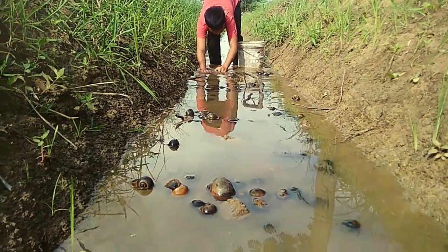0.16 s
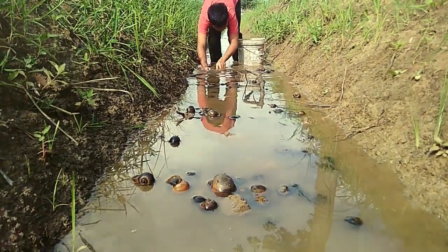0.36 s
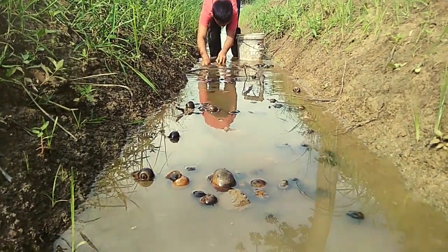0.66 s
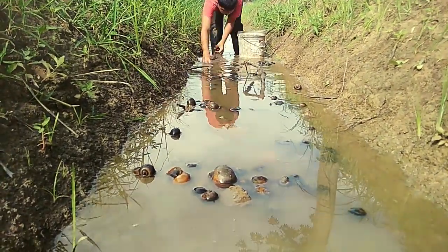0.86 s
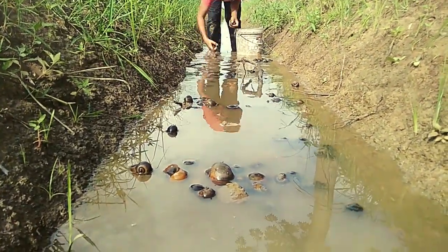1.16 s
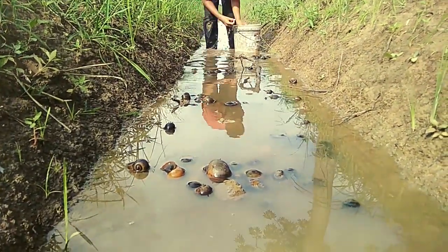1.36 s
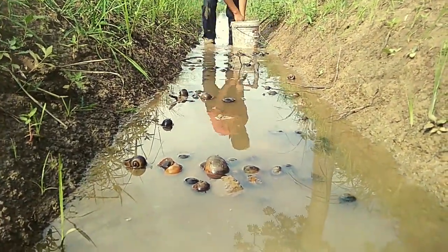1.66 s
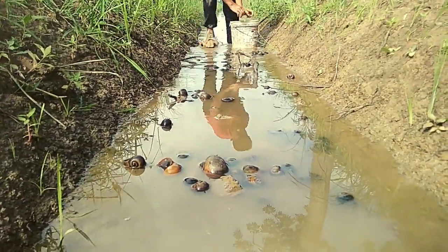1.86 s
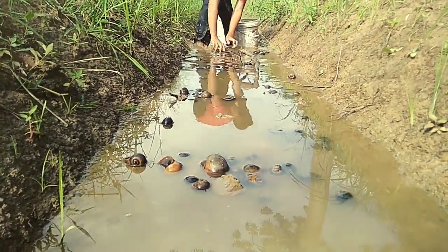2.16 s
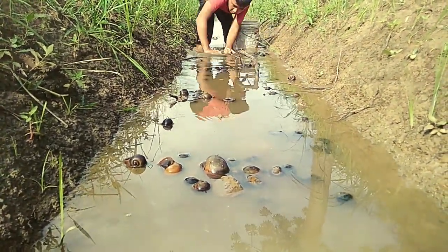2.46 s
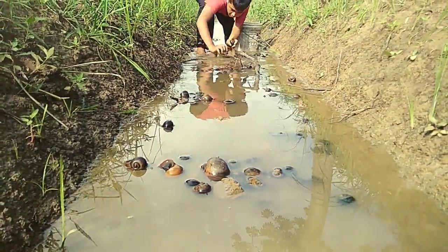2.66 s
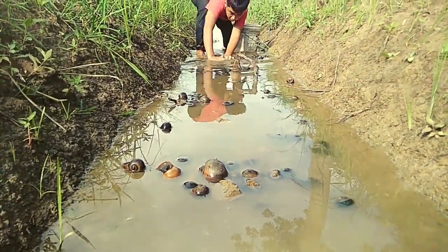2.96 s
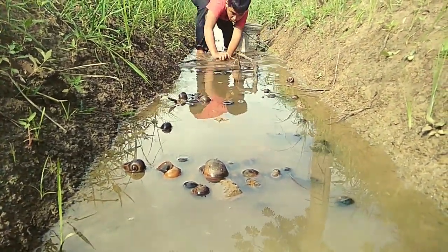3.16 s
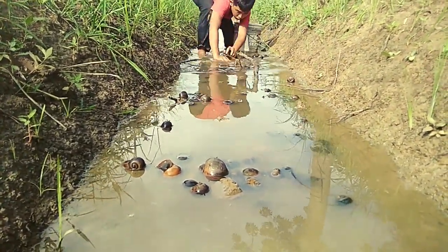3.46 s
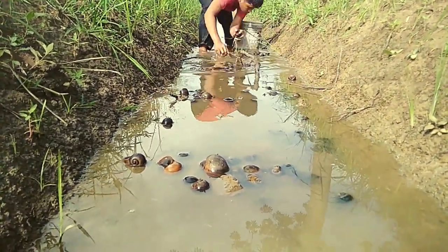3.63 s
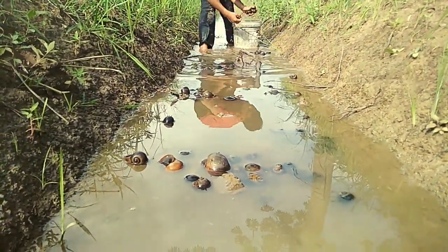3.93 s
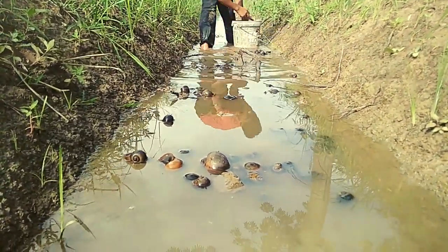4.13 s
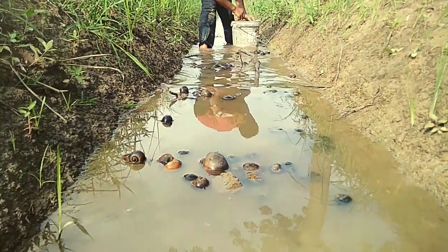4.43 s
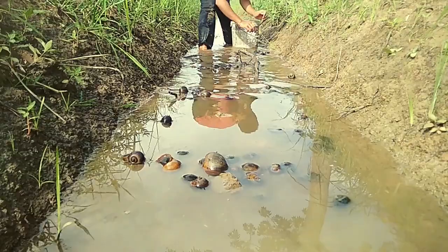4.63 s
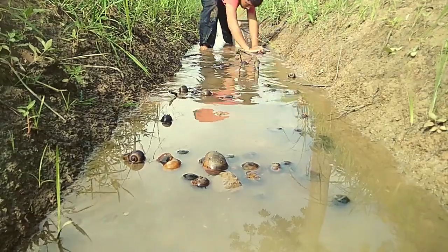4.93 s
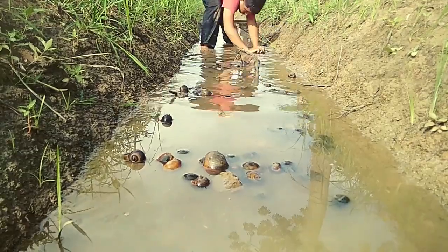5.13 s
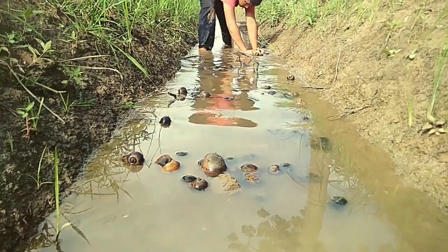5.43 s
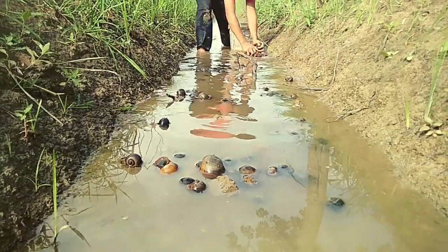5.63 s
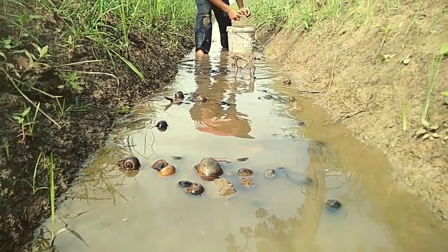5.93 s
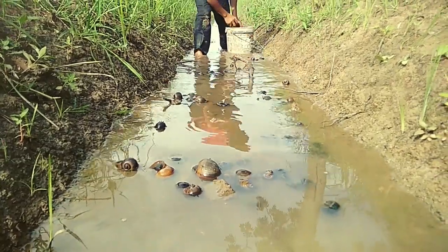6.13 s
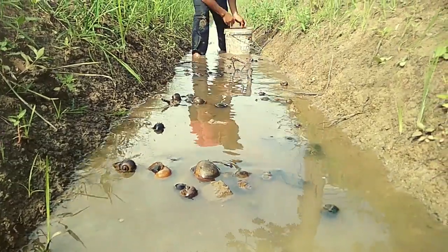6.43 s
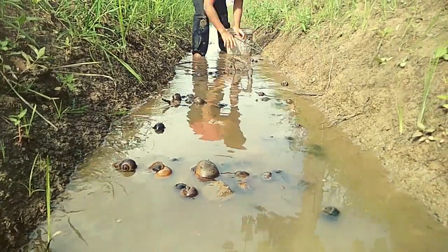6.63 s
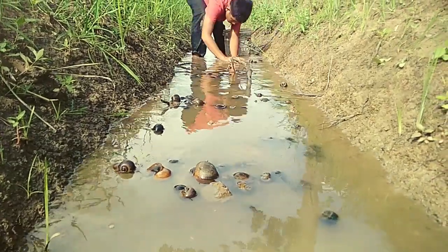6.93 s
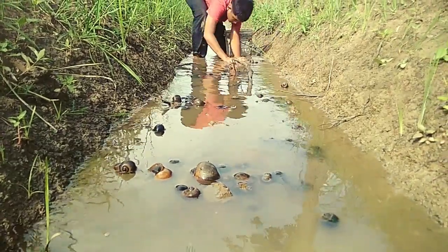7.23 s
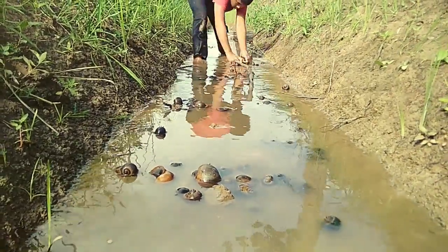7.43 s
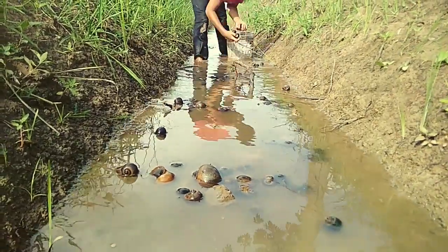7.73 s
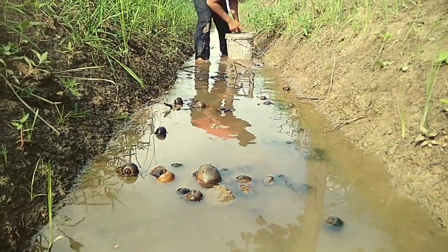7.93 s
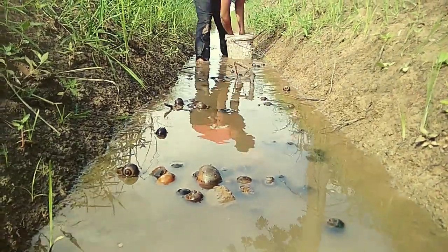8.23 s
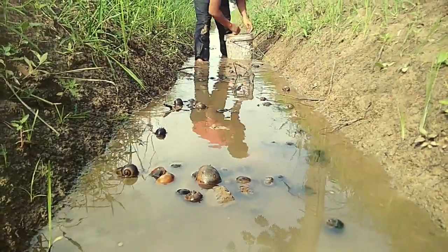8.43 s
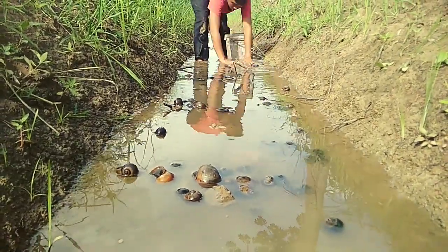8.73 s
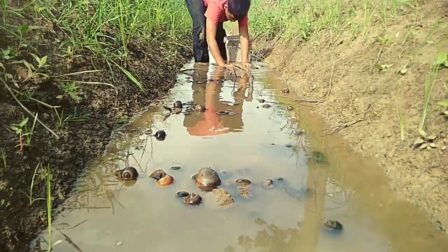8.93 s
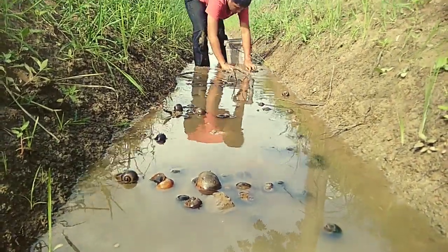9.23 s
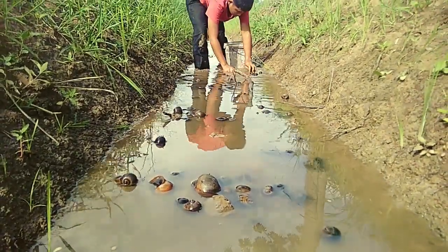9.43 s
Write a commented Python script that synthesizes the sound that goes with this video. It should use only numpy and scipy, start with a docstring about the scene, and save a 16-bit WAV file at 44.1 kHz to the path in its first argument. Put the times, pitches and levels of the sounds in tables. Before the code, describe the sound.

Hands stir shallow muddy ditch water with plops and drips, while snail shells click and tumble in clattering handfuls into a plastic bucket outdoors.

```python
"""Gathering snails in a muddy ditch

Hands stir shallow water: noise and crowds of ringing bubbles make splashes, gurgles, plops and drips.
Shells click together as filtered noise bursts, and handfuls tumble into a plastic bucket of damped modes.
Far away a one-cylinder engine chugs as a filtered pulse train, and a small bird whistles in gliding sines.
Shaped noise makes a steady hiss, almost all on the left, and a broad background that falls and rises;
moving air rumbles and bumps at the microphone.
"""
import sys
import numpy as np
from scipy import signal
from scipy.fft import rfft, irfft, next_fast_len
from scipy.io import wavfile
from scipy.ndimage import map_coordinates

SR = 44100
rng = np.random.default_rng(int(sys.argv[2]) if len(sys.argv) > 2 else 0)


def store_pcm(level_fs):
    """Save levels as 16-bit WAV."""
    pcm = np.round(np.clip(level_fs, -1, 1) * 32767).astype(np.int16)
    wavfile.write(sys.argv[1], SR, np.atleast_2d(pcm).T)


N = 422473

# spectrum of stirred water, also of the wet scrape on the bucket: (frequency [Hz], level [dB])
SLOSH_SPECTRUM = [(150, 0), (350, 4), (550, 1.5), (900, 4), (1500, -2.5), (3000, -1.5), (6000, -29.5)]
FADE_IN_S = .006  # a short noise fade-in before each click
TOP_HZ = 15950  # upper limit of the band


def amp(db):
    """Decibels are a logarithmic measure: 20 dB is a factor of ten in amplitude."""
    return 10 ** (np.asarray(db) / 20)


def unit(x):
    """Root-mean-square normalisation: equal mean power for every signal."""
    return x / np.sqrt(np.mean(x ** 2) + 1e-20)


def seconds(length):
    """Uniform sampling: the times [s] of the samples in a sound."""
    return np.arange(int(length * SR)) / SR


def along(points, hz):
    """Logarithmic frequency scale: (frequency [Hz], value) points are joined along it."""
    f, v = np.transpose(points)
    return np.interp(np.log(hz + 1), np.log(f + 1), v)


def curves(rows):
    """Linear interpolation in time: one value per sample for each column after the time."""
    s, *cols = np.transpose(rows)
    return [np.interp(np.arange(N) / SR, s, c) for c in cols]


def wobble(rate):
    """Slow random modulation: a smooth curve through normal random knots, rate of them a second."""
    knots = rng.standard_normal(int(N * rate / SR) + 4)
    return map_coordinates(knots, [np.arange(N) * rate / SR])


def add(track, s, sound):
    """Superposition: a sound is summed into the track from second s."""
    start = max(round(s * SR), 0)
    part = track[start:start + len(sound)]
    part += sound[:len(part)]


def filtered(x, response):
    """Linear filtering: the spectrum of x times a complex response of frequency."""
    m = next_fast_len(N + SR // 2)
    return irfft(rfft(x, m) * response(np.fft.rfftfreq(m, 1 / SR)), m)[..., :N]


def coloured(x, spectrum, size=4096):
    """Minimum-phase filtering: a causal kernel of energy 1 with the given (Hz, dB) shape."""
    cepstrum = irfft(np.log(amp(along(spectrum, np.fft.rfftfreq(size, 1 / SR)))))
    # folding the cepstrum onto positive times makes the kernel causal
    cepstrum[1:size // 2] *= 2
    cepstrum[size // 2 + 1:] = 0
    kernel = irfft(np.exp(rfft(cepstrum)))
    return signal.fftconvolve(x, kernel / np.linalg.norm(kernel))[:len(x)]


def noise(spectrum):
    """Spectral shaping: white noise takes the given colour, at rms 1."""
    return unit(coloured(rng.standard_normal(N), spectrum))


def panned(x, left_db):
    """Level difference between ears: left is louder by left_db, and the mean of both stays x."""
    ratio = amp(left_db)
    return np.array([x * ratio, x]) * 2 / (1 + ratio)


def ring(modes, t, scatter_db):
    """Modal vibration: damped sines whose strengths vary with the spot that is struck; peak 1."""
    hz, db, t60 = np.transpose(modes)[:, :, None]
    strength, detune = rng.standard_normal((2, len(modes), 1))
    decay = amp(db + scatter_db * strength - 60 * t / t60)
    x = np.sum(decay * np.sin(2 * np.pi * hz * (1 + 0.0095 * detune) * t), axis=0)
    return x / np.abs(x).max()


def burst(spectrum, t, t60):
    """Exponential decay: coloured noise dies by 60 dB in t60 seconds; peak 1."""
    x = coloured(amp(-60 * t / t60) * rng.standard_normal(len(t)), spectrum)
    return x / np.abs(x).max()


def droplets(rate, centre_hz, spread, cycles, size_db, size=600):
    """Bubble resonance in a crowd: tiny drops and bubbles ring and rise in pitch as they die; rms 1."""
    count = int(rate * N / SR)
    start = rng.integers(0, N, (count, 1))
    hz = centre_hz * np.exp(spread * rng.standard_normal((count, 1)))
    hz = np.clip(hz, 200, SR / 3)
    turns = hz * np.arange(size) / SR
    age = turns / cycles
    strength = amp(size_db * np.minimum(rng.exponential(size=(count, 1)), 3))
    drops = strength * np.exp(-age) * np.sin(2 * np.pi * turns * (1 + age / 20))
    return unit(np.bincount((start + np.arange(size)).ravel(), drops.ravel(), N)[:N])


def plop(t, hz, glide, length):
    """Air-pocket resonance: pitch glides as the pocket changes size; churned water makes it ragged."""
    u = t / length
    phase = 2 * np.pi * np.cumsum(hz * 2 ** (glide * np.minimum(u, 1.5))) / SR
    churn = coloured(rng.standard_normal(len(t)), [(hz / 12, 0), (hz / 2, -15), (hz * 10, -60)])
    swell = 4.5 * u
    return swell * np.exp(1 - swell) * (.85 * np.sin(phase) + .5 * churn * np.cos(phase))


def clack(spectrum, crack_s, rattle_s, hold_s=0):
    """Impact of hard wet shells: fade-in, crack that may hold, and rattle, through their resonances."""
    scatter_db = 2.5  # every shell has resonances of its own
    t = seconds(.09) - FADE_IN_S
    late = np.maximum(t - hold_s, 0)
    dying = amp(-60 * late / crack_s) + amp(-5) * amp(-60 * late / rattle_s)  # both times are t60
    fade_in = amp(-8 - 60 * abs(t) / .015)
    shape = np.where(t < 0, fade_in, dying)
    hz = np.geomspace(spectrum[0][0], TOP_HZ, 48)
    own = np.column_stack([hz, along(spectrum, hz) + scatter_db * rng.standard_normal(len(hz))])
    click = coloured(shape * rng.standard_normal(len(t)), own)
    return amp(9.5) * click / np.linalg.norm(click)


def splashes():
    """Entrained air: each stroke sloshes around the pitch of its hollow, sprays drops, then gurgles."""
    # strokes that stir, lift or spill water: (time [s], length [s], slosh level before its swell [dB],
    # spray level before its swell [dB], pitch of the hollow [Hz])
    strokes = [(1.176, 0.19, -61, -57.5, 1500), (1.812, 0.12, -45.5, -58, 790),
               (1.98, 0.074, -70, -44, 2500), (2.036, 0.042, -48, -48.5, 2000),
               (2.077, 0.18, -50, -52, 576), (2.19, 0.26, -57, -59, 980), (2.433, 0.05, -64, -60.5, 2000),
               (2.852, 0.041, -44.5, -45, 2730), (2.909, 0.057, -64, -48.5, 2960),
               (3.4, 0.03, -62, -53.5, 3320), (4.42, 0.11, -48, -58, 1060), (6.577, 0.052, -57, -50, 2300),
               (6.916, 0.0074, -39, -37.5, 1370), (7.478, 0.024, -49, -60, 980),
               (8.225, 0.031, -43, -66, 705), (8.27, 0.071, -51.5, -57, 2500)]
    # spectrum of the fine spray: (frequency [Hz], level [dB])
    spray_spectrum = [(900, -10.5), (2300, 6), (3200, 5.5), (4500, 3), (7000, 9), (10000, 10.5),
                      (15000, 4.5)]
    pocket_q, pocket_db = 2.8, 5  # ringing hollow: sharpness, level over the plain slosh
    gurgle_db, gurgle_lasts = -13.5, 3.15  # level relative to the slosh, decay time in stroke lengths
    coarse = droplets(1300, centre_hz=1089, spread=0.715, cycles=10, size_db=3.5)
    fine = droplets(3500, centre_hz=5085, spread=0.63, cycles=5, size_db=4)
    fine = fine + 0.72 * rng.standard_normal(N)
    gurgles = droplets(180, centre_hz=850, spread=.6, cycles=9, size_db=4.5, size=2400)
    wash = unit(coloured(coarse, SLOSH_SPECTRUM))
    mist = unit(coloured(fine, spray_spectrum))
    clumps = unit(amp(3.1 * wobble(95)))  # water breaks up in uneven gulps
    track = np.zeros(N)
    for s, length, slosh_db, spray_db, hz in strokes:
        span = slice(max(round(s * SR), 0), min(round(s * SR) + SR, N))
        t = np.arange(span.stop - span.start) / SR
        u = t / (0.33 * length)
        settling = amp(-19) * (1 - np.exp(-u)) * np.exp(-t / 0.07)  # the water settles after the stroke
        swell = u * np.exp(1 - u) + settling
        pocket = unit(signal.lfilter(*signal.iirpeak(hz, pocket_q, fs=SR), wash[span]))
        slosh = amp(slosh_db) * unit(wash[span] + amp(pocket_db) * pocket)
        spray = amp(spray_db) * mist[span]
        churned = amp(slosh_db + gurgle_db) * (1 - np.exp(-u)) * np.exp(-t / (gurgle_lasts * length))
        add(track, s, clumps[span] * swell * (slosh + spray) + churned * gurgles[span])
    return track


def bubbles():
    """Volume resonance of trapped air: the hands close air pockets under the water, and they plop."""
    # pockets: (time [s], level [dB], starting pitch [Hz], glide [octaves per length], length [s])
    pockets = [(1.14, -42.5, 294, -0.86, 0.055), (1.283, -44.5, 659, 0.99, 0.041),
               (1.915, -36, 640, -0.38, 0.019), (2.024, -46, 1076, 0.25, 0.04),
               (2.089, -46, 605, 0.27, .03), (2.223, -32.5, 295, 1, 0.038), (2.277, -42, 440, 0.32, 0.04),
               (2.868, -33, 487, 0.31, 0.015), (5.492, -45.5, 2365, -0.6, 0.02),
               (6.907, -28.5, 723, 0.14, 0.014), (6.93, -38, 463, 0.013, 0.013),
               (7.495, -34, 1246, 0.14, 0.015), (8.224, -34.5, 480, -0.12, 0.0085),
               (8.592, -34.5, 1095, 0.084, 0.022)]
    track, t = np.zeros(N), seconds(.15)
    for s, db, hz, glide, length in pockets:
        add(track, s, amp(db) * plop(t, hz, glide, length))
    return track


def drips():
    """Drop impact: a tick on the surface around the pitch of the one small bubble that it leaves."""
    # drops falling from the hands: (time [s], level [dB], bubble pitch [Hz])
    drops = [(.179, -47.5, 2410), (.233, -50, 1500), (1.153, -54, 1380), (1.225, -44, 1570),
             (1.333, -47, 1990), (1.429, -50, 1820), (2.08, -38, 1390), (2.287, -43, 1057),
             (2.441, -46, 2750), (2.58, -47, 2220), (2.753, -42.5, 2800), (3.4, -43, 1770),
             (4.113, -47.5, 1470), (5.0, -40, 1410), (9.337, -47, 2700)]
    length, glide, tick_db = 0.013, 0.12, 4  # bubble length [s], rise [octaves per length]; tick [dB]
    track, t = np.zeros(N), seconds(2 * length)
    for s, db, hz in drops:
        tick = burst([(hz / 2, -10), (hz, 0), (hz * 10, -20)], t, t60=2 * length)
        add(track, s, amp(db) * (plop(t, hz, glide, length) / 2 + amp(tick_db) * tick))
    return track


def shells():
    """Brief contact: shells click together in the hands, and a spectral tilt sets how bright each is."""
    # clicks: (time of the crack [s], level [dB], tilt about 4 kHz [dB per octave])
    clicks = [(.659, -39.5, 1), (0.69, -26.5, 8.5), (1.226, -31, -5.5), (2.376, -15, -.5),
              (2.3939, -9.5, -1.5), (2.533, -36.5, -7), (2.873, -25, -2), (2.924, -22.5, 0),
              (4.981, -36, -2), (6.909, -22, 5), (8.861, -23, -3.5), (8.874, -26, 6)]
    # spectrum of shell on shell: (frequency [Hz], level [dB])
    shell_spectrum = [(600, -8.5), (2000, -7.5), (3100, 7.5), (4000, -8.5), (5100, 3.5), (6500, 7.5),
                      (9000, 5), (15000, -2)]
    track = np.zeros(N)
    for s, db, tilt_db in clicks:
        spectrum = [(hz, level + tilt_db * np.log2(hz / 4000)) for hz, level in shell_spectrum]
        add(track, s - FADE_IN_S, amp(db) * clack(spectrum, crack_s=.0035, rattle_s=.012))
    return track


def bucket():
    """Modal impact: a shell thuds on the plastic bottom, tips on its neighbours and scrapes the wall."""
    # shells that land and bounce: (time [s], thud level [dB], clack level [dB])
    landings = [(1.549, -35, -57), (1.767, -30.5, -42), (1.777, -37, -28), (1.814, -31.5, -34),
                (1.842, -42, -33), (1.861, -40, -32), (1.889, -33, -22), (1.919, -32.5, -30),
                (1.945, -36, -24), (1.981, -33, -30), (2.006, -37.5, -50), (4.412, -25.5, -17),
                (4.441, -24, -27.5), (4.461, -20.5, -25.5), (4.475, -42, -28), (4.505, -27.5, -25),
                (4.526, -50, -28), (4.547, -34, -36), (4.585, -40, -47), (4.69, -48, -45),
                (4.843, -43.5, -35.5), (6.422, -29, -24), (6.447, -37, -26.5), (6.464, -32.5, -36),
                (6.482, -31, -35.5), (6.535, -31, -13), (6.556, -29, -47), (6.632, -35.5, -40.5),
                (8.223, -33, -42), (8.366, -38.5, -34), (8.405, -33.5, -33), (8.467, -32.5, -29),
                (8.502, -28.5, -31.5), (8.522, -42, -25), (8.555, -34.5, -36), (8.589, -25.5, -28.5),
                (8.616, -47, -28), (8.634, -31.5, -36), (8.703, -37.5, -54), (8.881, -36.5, -40),
                (9.03, -42, -45)]
    # modes of the bucket's bottom: (frequency [Hz], level [dB], t60 [s])
    bottom = [(156, -1.5, 0.078), (293, -25, 0.15), (309.7, 13.5, 0.12), (349, 0.5, 0.22),
              (602, -6.5, 0.13)]
    # modes of the bucket's wall: (frequency [Hz], level [dB], t60 [s])
    wall_modes = [(756, -6, 0.082), (866, 3.5, 0.12), (1147, -3.5, 0.092), (1400, -3, 0.052),
                  (2220, -11, 0.029), (2767, -9.5, 0.035), (3530, -4, 0.038), (4370, -3, .04),
                  (4980, -17, .04)]
    # spectrum of the jolted heap: (frequency [Hz], level [dB])
    heap_spectrum = [(60, -33), (160, 8), (260, 9), (520, 5), (750, -26.5), (6000, -60)]
    # spectrum of shells clacking in the heap: (frequency [Hz], level [dB])
    clack_spectrum = [(500, 6.5), (900, 4.5), (1700, 1), (2700, 5.5), (4500, -3.5), (5500, -1), (7000, 2.5),
                      (15000, -9.5)]
    tip_s = .009  # a landed shell tips against its neighbours this much later
    wall_db, scrape_db = -4, -8.5  # wall ring and wet scrape, relative to the mean of thud and clack
    track, t = np.zeros(N), seconds(.25)
    for s, thud_db, clack_db in landings:
        thud = ring(bottom, t, scatter_db=1.5) + amp(-8) * burst(heap_spectrum, t, t60=.06)
        wall = amp(wall_db) * ring(wall_modes, t, scatter_db=4)
        scrape = amp(scrape_db) * burst(SLOSH_SPECTRUM, t, t60=.12)
        # many shells move at once in the heap, so its clack holds, then dies
        heap_clack = clack(clack_spectrum, crack_s=.011, rattle_s=.05, hold_s=.004)
        add(track, s, amp(thud_db) * thud)
        add(track, s + tip_s, amp((thud_db + clack_db) / 2) * (wall + scrape))
        add(track, s + tip_s - FADE_IN_S, amp(clack_db) * heap_clack)
    return track


def bird():
    """Frequency and amplitude modulation: thin distant whistles arch, sag and rasp."""
    # whistles: (time [s], length [s], level before the flutter [dB], pitch at the top of the arch [Hz])
    whistles = [(5.293, 0.054, -63, 3500), (7.497, 0.088, -62, 3420), (9.412, 0.1, -53, 3600)]
    track = np.zeros(N)
    for s, length, db, hz in whistles:
        u = seconds(length) / length
        pitch = hz * (1 - 0.147 * (u - .3) ** 2) + 30 * wobble(134)[:len(u)]
        envelope = np.abs(np.sin(np.pi * u)) ** 0.14
        add(track, s, amp(db) * envelope * np.sin(2 * np.pi * np.cumsum(pitch) / SR))
    flutter = amp(2 * wobble(60) + 3 * wobble(500))
    return track * flutter


def engine():
    """Pulse train: one dull exhaust puff per firing, blurred by distance, with a haze of clatter."""
    # course of the engine: (time [s], level before the offsets of puffs and clatter [dB])
    course = [(0, -65.5), (2, -57), (4.3, -58.5), (6.3, -51), (9.58, -49.5)]
    # spectrum of the exhaust: (frequency [Hz], level [dB])
    exhaust = [(30, -34), (60, -14.5), (85, 1), (108, 1), (130, -2.5), (170, -8), (260, -28.5), (3000, -96)]
    # spectrum of the mechanical clatter: (frequency [Hz], level [dB])
    clatter_spectrum = [(420, -4.5), (500, 4.5), (620, -1), (760, -0.5), (900, -37.5)]
    db, = curves(course)
    turns = np.cumsum(21 + 0.2007 * wobble(1.8)) / SR + 0.3043  # about 21 firings a second
    firings = np.diff(np.floor(turns), prepend=0) * amp(2.3 * wobble(29))
    puffs = unit(coloured(firings, exhaust)) + 0.65 * noise(exhaust)
    clatter = noise(clatter_spectrum)
    return panned(amp(db - 1.5) * puffs, left_db=6.0) + panned(amp(db - 11.0) * clatter, left_db=3)


def background():
    """Shaped noise: a steady hiss, a broad noise that falls and rises, and air rumbling and bumping."""
    # course of the broad noise: (time [s], left level before its random sway [dB])
    course = [(0, -52.5), (.45, -75.5), (2.6, -55), (4, -69), (5.3, -58), (7.1, -50.5), (9.58, -52)]
    # spectrum of the steady hiss: (frequency [Hz], level [dB])
    hiss_spectrum = [(300, 10), (900, 3.5), (2200, -2), (3400, 4), (5000, -1), (6800, 5), (7600, 9),
                     (8400, -1), (10000, 0.5), (14000, -24.5)]
    # spectrum of the broad noise: (frequency [Hz], level [dB])
    broad_spectrum = [(200, 7), (600, 1.5), (980, 2.5), (1300, 4.5), (4500, 1), (10000, 0), (15000, -18)]
    # spectrum of air rumbling at the ports: (frequency [Hz], level [dB])
    rumble_spectrum = [(15, -23.5), (45, 1.5), (80, 3.5), (140, -4.5), (250, -18.5), (3000, -71)]
    # puffs of air at the microphone: (time of the peak [s], peak of the two channels' mean [dB])
    puffs = [(0.695, -42), (2.808, -36), (4.18, -33.5), (4.398, -29.5), (4.708, -30.5), (5.269, -36),
             (5.45, -36.5)]
    broad_sway_db, rumble_sway_db = 1.3, 1.8  # slow random swing of each level
    bump_hz = 86
    broad_db, = curves(course)
    # the hiss is almost all on the left
    hiss = amp(-57.0) * np.array([noise(hiss_spectrum), amp(-43) * noise(hiss_spectrum)])
    broad = np.array([noise(broad_spectrum), amp(-11.5) * noise(broad_spectrum)])
    broad = amp(broad_db + broad_sway_db * wobble(2.783)) * broad
    shared = panned(noise(rumble_spectrum), left_db=6.0)
    separate = np.array([noise(rumble_spectrum), 0.45 * noise(rumble_spectrum)])
    rumble = amp(-55.5 + rumble_sway_db * wobble(4)) * (shared + 0.72 * separate)
    bumps, t = np.zeros(N), seconds(.08) - .04
    for s, peak_db in puffs:
        bump = np.exp(-(t * bump_hz / 0.5) ** 2) * np.cos(2 * np.pi * bump_hz * t)
        add(bumps, s + t[0], amp(peak_db) * bump)
    return hiss + broad + rumble + panned(bumps, left_db=26)


def banks(x):
    """Diffuse reverberation: the earth banks scatter a short answer, different at each ear."""
    # decay of the answer: (frequency [Hz], t60 [s])
    decay = [(200, .09), (2000, .07), (12000, .06)]
    hz, t, z = signal.stft(rng.standard_normal((2, SR // 4)), SR, nperseg=256)
    dying = amp(-60 * t / along(decay, hz)[:, None])
    treble = (hz / (hz + 900))[:, None]  # the answer is weaker in the bass
    tail = signal.istft(z * dying * treble, SR, nperseg=256)[1]
    return signal.fftconvolve(x, tail / np.linalg.norm(tail[0]), axes=1)[:, :N]


def scene():
    """Level and phase differences between ears place the near work; banks, engine and noise surround it."""
    # lean of the near sounds to the left: (frequency [Hz], left over right [dB])
    lean = [(200, 5.4), (1000, 8.2), (1900, 5.4), (6000, 11), (15000, 4.6)]

    def ports(hz):
        """Phase difference: the left port lags the right, most in the treble."""
        turn = 2.32 * (hz / 10000) ** 0.93  # lag [radians]
        return panned(np.ones(len(hz)), along(lean, hz)) * np.exp(.5j * turn * np.array([[-1], [1]]))

    work = filtered(bucket() + bubbles() + drips() + shells() + splashes() + bird(), ports)
    return work + amp(-4) * banks(work) + engine() + background()


def record(dry):
    """Frequency response: the microphone has a few narrow dips, and nothing passes above the band limit."""
    dips = [np.concatenate(signal.iirnotch(hz, 20, fs=SR)) for hz in (695, 812, 945)]
    return filtered(signal.sosfilt(dips, dry), lambda hz: hz < TOP_HZ)


dry = scene()
out = record(dry)
store_pcm(out)
```